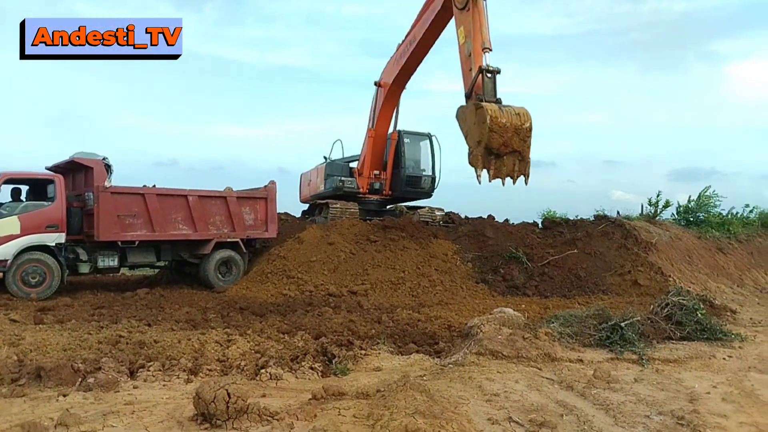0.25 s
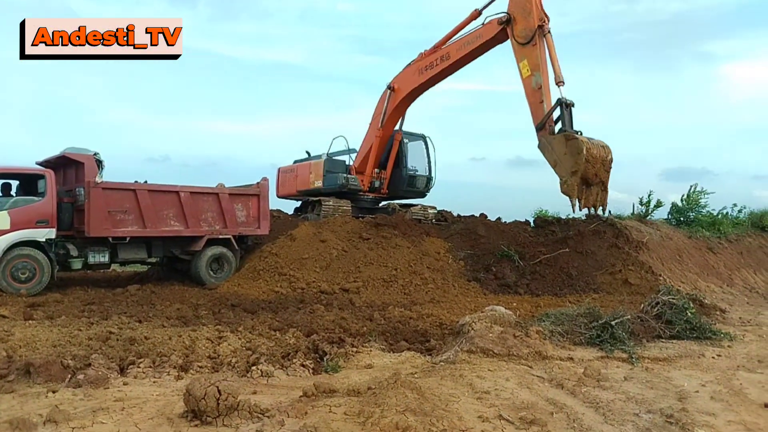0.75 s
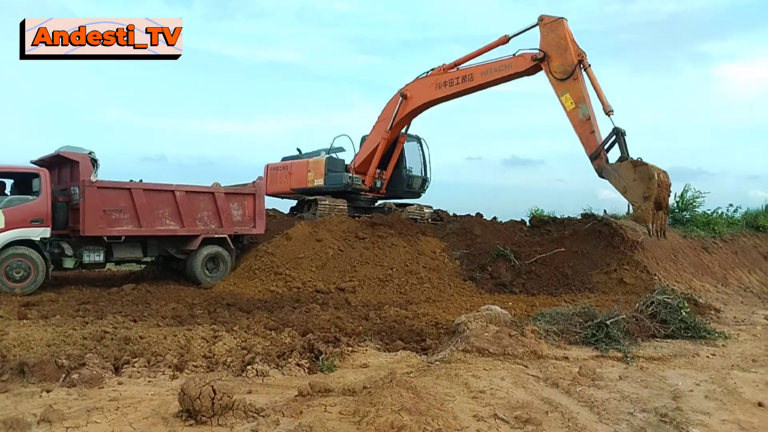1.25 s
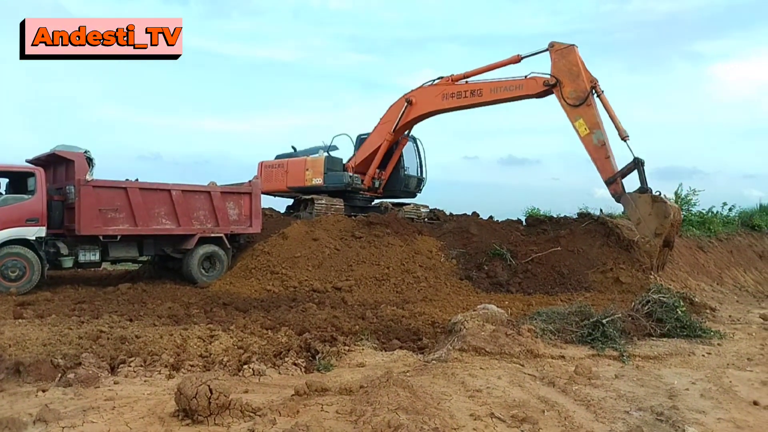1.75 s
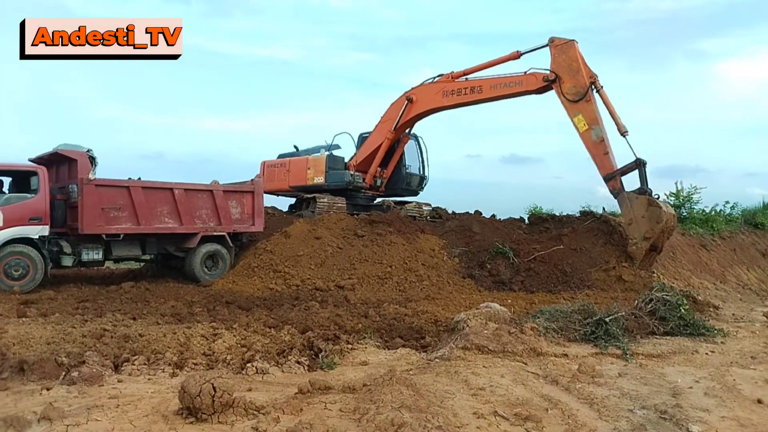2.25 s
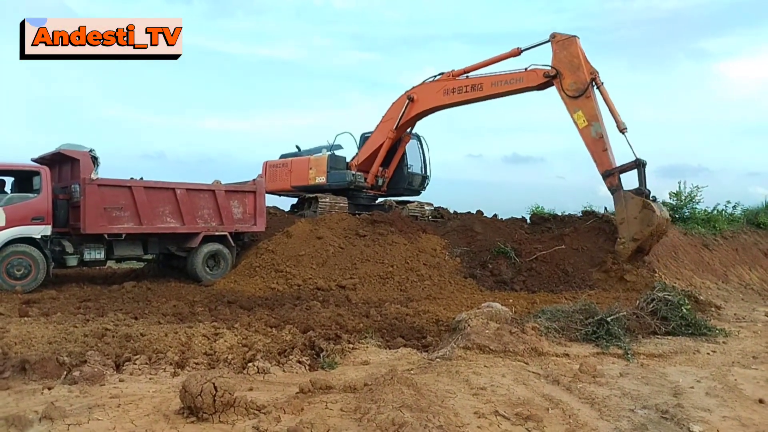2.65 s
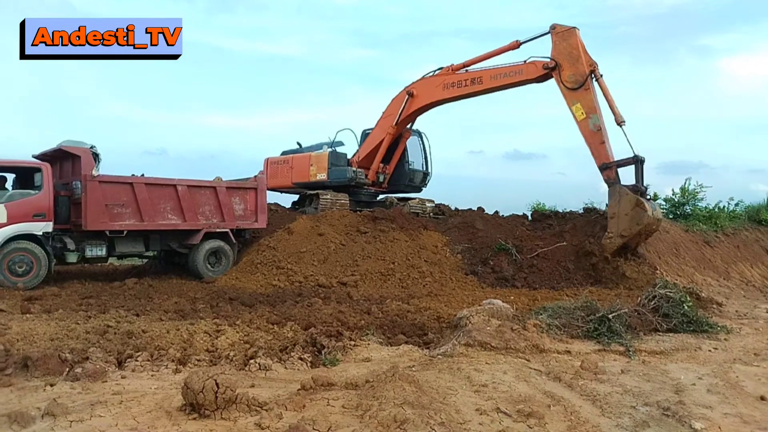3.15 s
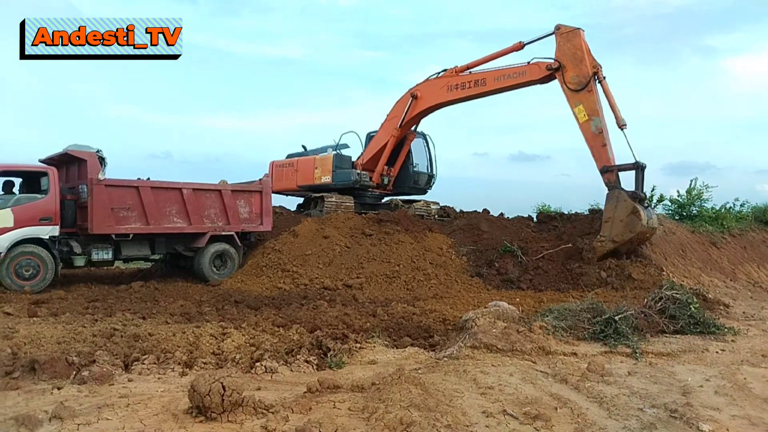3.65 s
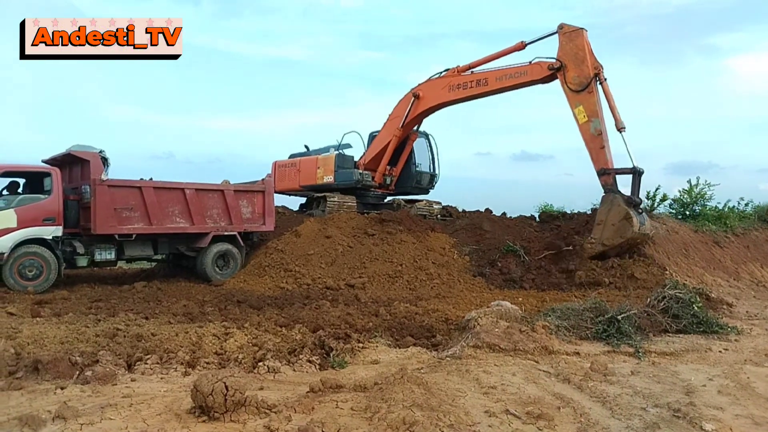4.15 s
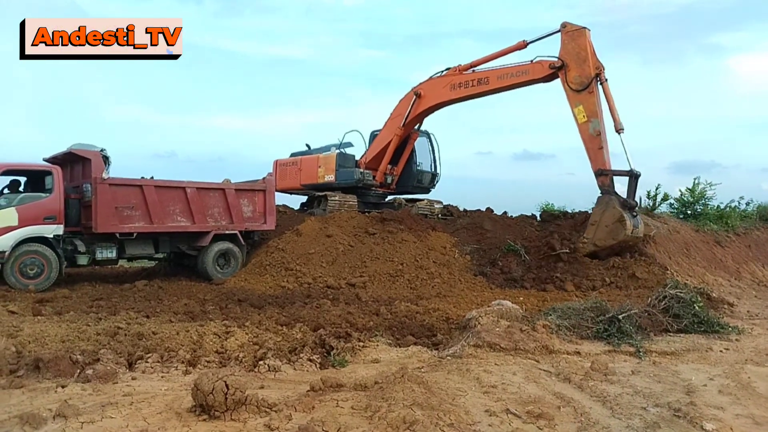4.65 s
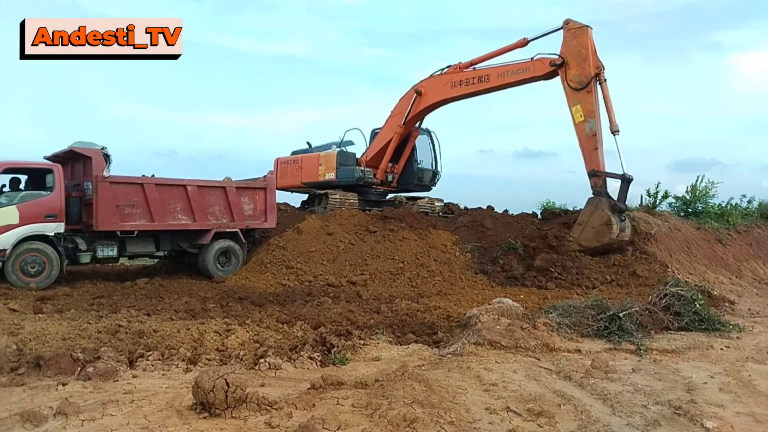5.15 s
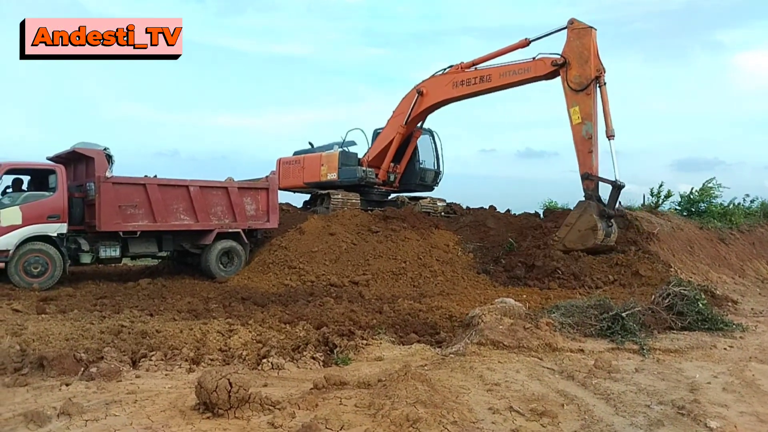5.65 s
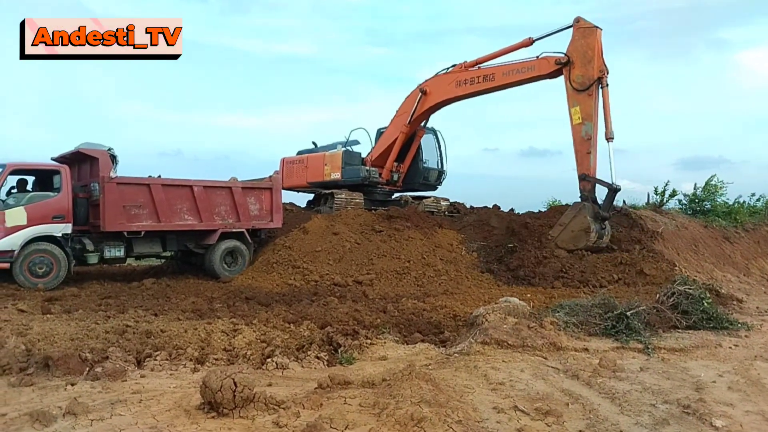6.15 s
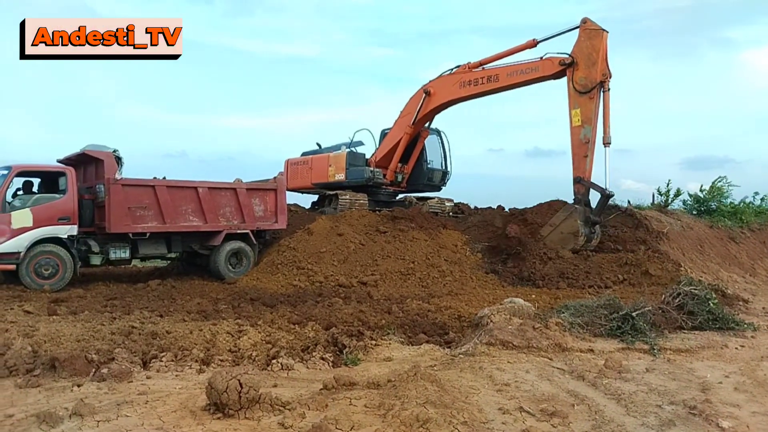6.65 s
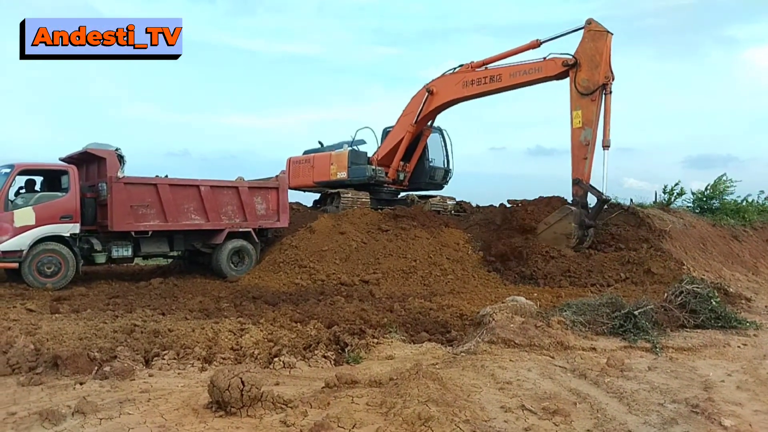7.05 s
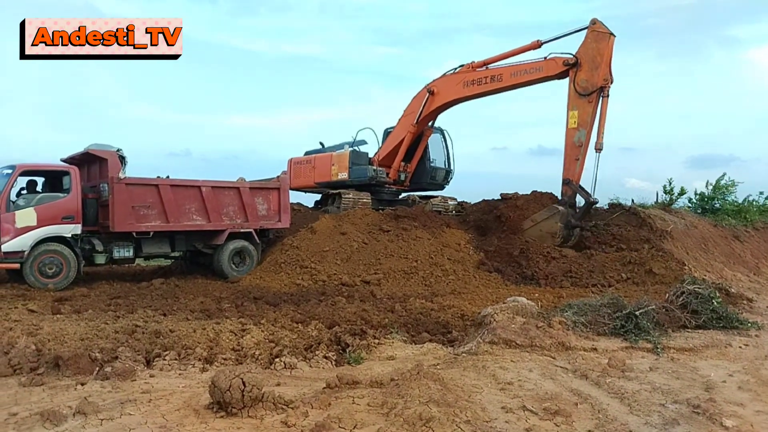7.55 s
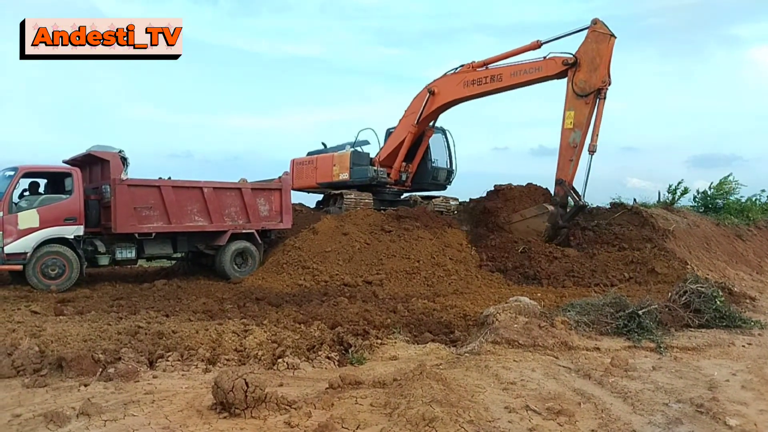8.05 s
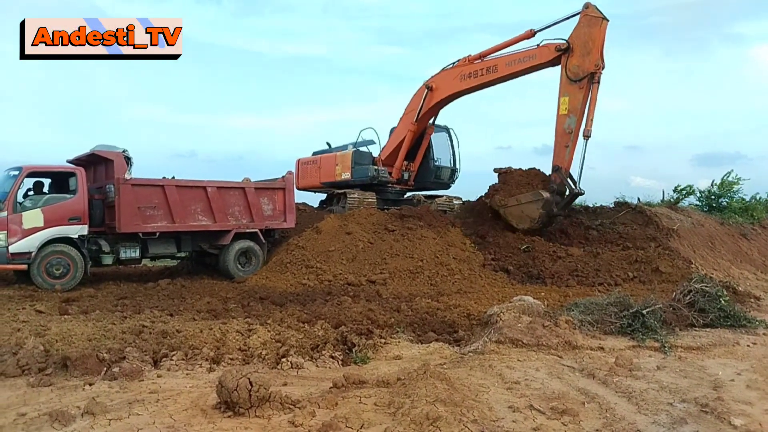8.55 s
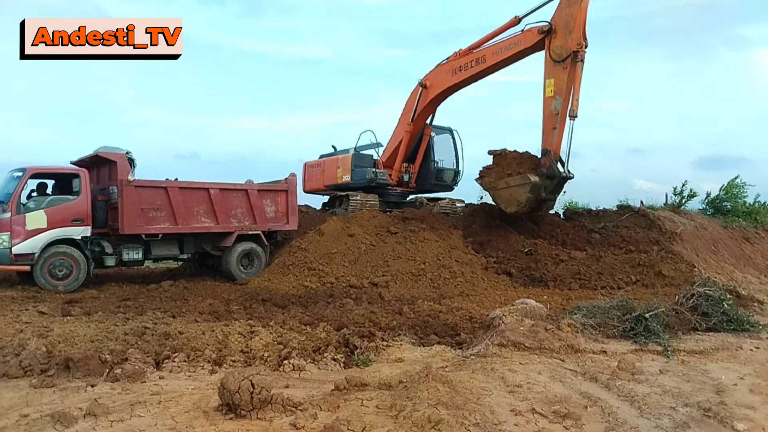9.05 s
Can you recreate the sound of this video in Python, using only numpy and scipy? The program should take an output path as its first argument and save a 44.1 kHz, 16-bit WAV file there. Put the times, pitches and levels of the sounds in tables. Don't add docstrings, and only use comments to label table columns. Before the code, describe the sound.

On an open, windy dirt mound, a close phone microphone is battered by gusts: deep fluttering booms and abrupt thumps almost continuous from 0 to 3 seconds, the worst near 0.7, 1.6 and 4.6, briefly ducking the sound. Under them a diesel excavator roars steadily, with fan and pump hum near 170 Hz and a thin wavering turbo whistle around 8 kHz. Until 2 seconds the swing adds airy hiss; rough joint groans, rubs and short squeals come at 0.2 to 1. At 2.33 the bucket lands with a quick double clank, bright scraping and a short ring. The hum rises near 3; hard pebble pings hit at 3.23 and 3.45. Digging follows, the whistle swelling at 4.1, 5, 6.2, 6.8, 7.2 and 8, with tiny grit snaps at 5.2 and 7.1. A truck idles, ticking about 23 times a second. Wind thuds continue more sparsely until 9.3.

```python
import sys
import numpy as np
from scipy import signal
from scipy.fft import rfft, irfft
from scipy.io import wavfile
from scipy.ndimage import uniform_filter1d, minimum_filter1d

SR = 44100
rng = np.random.default_rng(int(sys.argv[2]) if len(sys.argv) > 2 else 0)


def level_to_linear(level):
    exponent = np.asarray(level, float) / 20
    return 10 ** exponent


def dump(signal):
    limited = np.clip(np.atleast_2d(signal).T, -1, 1)
    pcm = np.round(limited * 32767).astype(np.int16)
    wavfile.write(sys.argv[1], SR, pcm)


N = 410571
TIME = np.arange(N) / SR


def unit(x):
    return x / np.sqrt(np.mean(x ** 2))


def read(table):
    s, *columns = np.transpose(table)
    return [np.interp(TIME, s, c) for c in columns]


def colour(x, points):
    hz, db = np.transpose(points)
    f = np.arange(N // 2 + 1) * SR / N + 1
    return irfft(rfft(x) * level_to_linear(np.interp(np.log(f), np.log(hz), db, left=-80, right=-80)), N)


def band(x, hz, width):
    return signal.lfilter(*signal.iirpeak(min(hz, .45 * SR), hz / width, SR), x)


def noise():
    return rng.standard_normal(N)


def steep(hz, width):
    return unit(band(band(noise(), hz, width), hz, width))


def walk(rate):
    k = int(SR / rate)
    held = np.repeat(rng.standard_normal(N // k + 1), k)
    return unit(uniform_filter1d(uniform_filter1d(held, k), k)[:N])


def burst(s, t60, rise):
    t = np.maximum(TIME - s, 0)
    return (1 - np.exp(-t / rise)) * np.exp(-np.log(1000) * t / t60)


def tone(phase, multiple=1):
    return np.sin(multiple * phase)


def wind():
    # t/s, peak level/dB, sharp edge above peak/dB
    sharp_eddies = [(0.578, 1, -16), (0.659, 10, -14.5), (0.7, 6, -12), (0.78, -11, -5), (0.87, 2.5, -13.5),
                    (1.005, 0, -18), (1.039, -2, -6.5), (1.064, 1, -7), (1.187, 2.5, -13), (1.265, 3, -16),
                    (1.295, -8, -1.5), (1.341, -6.5, -13), (1.443, -4.5, -13), (1.601, 10, -19),
                    (1.72, -1, -12), (1.913, -7, -12), (2.238, -3, -23), (2.308, -2, -19), (2.542, -3, -16),
                    (2.632, 4.5, -25), (2.887, 1.5, -15), (4.511, -3, -8.5), (4.554, 8, -14.5),
                    (4.633, 3.5, -9), (4.669, 2, -14), (4.733, -1.5, -11), (5.12, 4.5, -25),
                    (5.469, -2.5, -25), (5.719, -8, -11.5), (8.367, -2, -21), (1.02, 3, -12),
                    (1.134, -2.5, -14), (1.361, -13, -7), (1.402, -7, -9.5), (1.46, -9, -11),
                    (1.553, -11, -20), (2.098, -21, -20), (2.17, -18, -16), (2.323, -13, -19),
                    (2.383, -13, -6), (2.726, -8, -15), (2.916, -2, -14), (3.49, -16, -15),
                    (4.71, -19, -15), (5.103, -5, -16), (5.232, -10, -25), (5.499, -9, -16),
                    (7.274, -8, -20), (7.845, -13, -16), (8.248, -7, -18), (8.506, -8.5, -25),
                    (8.533, -21, -31), (9.259, -14, -17), (.721, 0.5, -14), (1.284, -7, -8),
                    (1.492, -3.5, -17), (1.52, -8, -17), (1.734, -2, -11), (1.815, -6, -16),
                    (2.344, -11, -10)]
    # t/s, peak level/dB
    puffs = [(.035, -2.5), (.814, -5), (1.65, 9), (1.766, 5.5), (1.95, -6.5), (2.018, -5), (2.41, -15),
             (2.497, -3), (2.688, 2), (2.93, -2), (3.471, -1.5), (3.698, -16), (3.982, -13), (4.984, -4),
             (5.08, -5.5), (5.171, -3), (5.432, -3), (5.554, -2.5), (5.676, -18), (6.915, -22.5),
             (7.261, -26), (7.597, -9.5), (7.826, -4), (7.931, -7.5), (8.06, -16), (8.231, -5.5),
             (8.481, -14), (8.555, -4), (8.981, -8.5), (9.08, -19)]
    # f/Hz, level/dB per Hz
    rumble_colour = [(6, -17), (14, 2), (40, -0.5), (70, 1), (130, -2), (200, -15)]
    # offset/dB, dB per dB of rumble, dB per dB of bite
    deep_law = (-0.55, 0.77, 0.037)
    deep_hz = 76

    flicker = walk(35)
    rumble = unit(colour(noise(), rumble_colour) * level_to_linear(0.69 * flicker + 1.82 * walk(12)))
    deep = colour(rumble, [(1, 0), (deep_hz, 0), (2 * deep_hz, -20)])
    buffet = colour(noise(), [(100, -2.5), (140, 3), (220, 1.0), (330, -13.5), (420, -23.0)])
    buffet = unit(buffet * level_to_linear(3.57 * flicker))
    pop_db = np.minimum(2.8 * rng.exponential(size=N), 7) + 3.2 * flicker
    pops = (rng.random(N) < 600 / SR) * noise() * level_to_linear(pop_db)
    flutter = unit(colour(pops, [(280, -18), (350, 2.5), (550, -4.5), (800, -15.5), (1300, -28.5), (2000, -74)]))
    steady = gusts(*deep_law) * deep + gusts(0, 1.23, 0.13) * (rumble - deep)
    steady += level_to_linear(-2.5) * gusts(-1.54, 1.18, 0.87) * buffet
    steady += level_to_linear(-4) * gusts(-10, 1.6, 2.86) * flutter

    eddies = sharp_eddies + [(s, db, -27.5) for s, db in puffs]
    body = sum(level_to_linear(db) * burst(s - .006, 0.13, 0.0056) for s, db, _ in eddies)
    thud = unit(colour(noise(), [(60, -1.5), (180, 0.5), (300, -7.5), (500, -17.5), (800, -28.5)]))
    chance = rng.standard_normal((len(eddies), 8))
    jumps = np.zeros(N)
    for (s, db, edge_db), row in zip(eddies, chance):
        delay = np.array([0, .002, .004, .007]) * (1 + 0.33 * row[:4])
        at = ((s + 0.001505 + delay) * SR).astype(int)
        jumps[at] += level_to_linear(db + edge_db + np.array([3.0, -4.5, -3.0, -3])) * np.sign(row[4:])
    snap = signal.sosfilt(signal.butter(2, [330, 780], "bandpass", fs=SR, output="sos"), jumps)
    return steady + level_to_linear(-0.5) * body * thud + level_to_linear(35) * snap


def gusts(offset_db, per_db, per_bite):
    # t/s, length/s, rumble level/dB, bite/dB (reach into the small eddies)
    gust_times = [(0, 0.1, -8.5, -2.5), (0.225, 0.16, -23, 4), (0.388, 0.16, -12.5, -2),
                  (0.545, .2, -10, 0.5), (0.764, 0.16, -9, 1), (0.993, 0.095, -8, 1.5),
                  (1.12, 0.036, -13, 3), (1.18, 0.15, -8.5, 0.5), (1.33, .14, -8.5, -0.5),
                  (1.498, 0.18, -10.5, 2), (1.702, 0.18, -10.5, 0), (1.891, 0.17, -8, -1),
                  (2.082, 0.16, -10.5, 0), (2.262, 0.064, -14.5, 1), (2.376, 0.15, -21.5, 4),
                  (2.477, 0.28, -11.5, 1), (2.78, 0.14, -8, 0), (3.005, 0.24, -21, -2),
                  (3.552, 0.051, -18, -17), (3.441, 0.041, -9, -15), (3.68, 0.024, -10.5, -5),
                  (3.965, 0.051, -11, -7), (4.489, 0.078, -10, 0.5), (4.612, 0.15, -7.5, -1.5),
                  (4.905, 0.34, -9, -6), (5.091, 0.2, -10.5, -4.5), (5.387, 0.13, -11, -1.5),
                  (5.656, 0.08, -9.5, -1), (5.787, 0.12, -23, 2), (6.468, 0.22, -20.5, -6),
                  (6.908, 0.013, -19, -2.5), (7.242, 0.022, -8.5, -4.5), (7.58, 0.015, -18.5, -8),
                  (7.793, 0.34, -13.5, -6.5), (8.19, .24, -13.5, -3), (8.47, 0.079, -7.5, -6.5),
                  (8.612, 0.11, -13, -5.5), (8.921, 0.11, -14, -4.5), (7.336, 0.26, -20, -12),
                  (9.242, 0.085, -16, -1.5)]
    lull_db, lull_bite_db, lull_sway_db = -25.5, -2.5, 0.5
    fall_t60_s = 0.28

    def gain(db, bite_db):
        return level_to_linear(-10 + offset_db + per_db * (db + 10.5) + per_bite * bite_db)

    power = gain(lull_db + lull_sway_db * walk(8.1), lull_bite_db) ** 2
    for s, length, db, bite_db in gust_times:
        rise_s = 0.022 + 0.082 * min(length, .25)
        rise = np.clip((TIME - s) / rise_s + .5, 0, 1) ** 2
        fall = level_to_linear(-60 * np.maximum(TIME - s - length, 0) / fall_t60_s)
        power = power + (gain(db, bite_db) * rise * fall) ** 2
    return np.sqrt(power)


def shoves():
    # t/s, peak level/dB, f/Hz
    slugs = [(.875, -2, 90), (2.79, -9, 60), (3.697, -15, 130), (4.508, -1.5, 90), (4.63, 0, 70),
             (5.7, -4, 69), (5.731, -1, 70), (6.916, -8.5, 65), (7.591, -7, 121), (8.256, -5, 110),
             (8.29, -3, 140), (8.504, -1.5, 90), (8.691, -1.5, 110)]
    cycles = 2.9
    out = 0
    for s, db, hz in slugs:
        out = out + level_to_linear(db + 3) * burst(s, cycles * 1.9 / hz, 0.0019) * np.sin(2 * np.pi * hz * (TIME - s))
    return out


def limit_swings(x):
    top, hold_s = 1.104, 0.0056
    k = int(hold_s * SR)
    return x * uniform_filter1d(minimum_filter1d(top / np.maximum(np.abs(x), top), k), k)


def turning():
    return np.clip((2 - TIME) / 0.5, 0, 1)


def excavator():
    # t/s, level/dB
    roar_level = [(0, -42), (.4, -37.5), (1.2, -43), (2.3, -39.5), (3.3, -42), (4.4, -41.5), (7.7, -42),
                  (8.07, -41), (8.4, -43), (9.31, -42.5)]
    # f/Hz, level/dB per Hz
    roar_colour = [(180, -13), (300, -9.5), (385, -4.5), (508, -2), (644, -5.5), (817, -0.5), (1090, -15.5),
                   (1380, -2), (1660, -6.5), (1870, -11), (2140, -11), (2670, -7.5), (4190, -21.5),
                   (5820, -17), (7000, -19.5), (9100, -50), (15400, -120)]
    # f/Hz, level/dB per Hz
    hiss_colour = [(5000, -18), (8500, -2.5), (9420, -3), (10200, -11.5), (12300, -12.5), (14500, -26),
                   (15600, -20)]
    # f/Hz, width/Hz, level/dB
    casing = [(938, 92, -0.5), (1330, 910, -6.5), (1854, 50, 8), (2520, 430, -3.5), (2850, 150, -31)]
    # t/s, rate/Hz
    firing_rate = [(0, 79.8), (3.4, 79.05), (4, 74.6), (6, 73.4), (7.5, 74.8), (8.6, 75.3), (9.31, 75.5)]
    # t/s, f/Hz
    spool = [(0, 8170), (.55, 8210), (.9, 8320), (1.2, 8340), (1.6, 8290), (2.3, 7880), (2.65, 7730),
             (3, 7940), (3.7, 8030), (5, 7900), (6, 7865), (6.8, 7875), (7.2, 7945), (7.8, 7920),
             (8.5, 8010), (9.31, 8030)]
    # t/s, level/dB, length/s
    surges = [
        (4.104, 2, 0.21),
        (4.526, 1, 0.18),
        (4.98, 5, 0.18),
        (6.202, 4, 0.074),
        (6.75, 7, 0.25),
        (7.21, 6.5, 0.4),
        (8.052, 4.5, 0.3),
    ]

    roar_db = read(roar_level)[0]
    hiss_db = roar_db - 5.5 + 2.5 * turning()
    turbo_db = np.where(TIME < 2.5, -42.5, -40.5) - 1.27 * walk(5.77)
    turbo_db += sum(db * np.exp(-((TIME - s) / length * 2) ** 2) for s, db, length in surges)

    firing = 2 * np.pi * np.cumsum(read(firing_rate)[0] * (1 + 0.00568 * walk(6.5))) / SR
    air = noise() * level_to_linear(0.56 * tone(firing) + 0.67 * walk(14))
    echoes = sum(level_to_linear(db) * band(air, hz, width) for hz, width, db in casing)
    roar = unit(colour(air + echoes, roar_colour))
    hiss = unit(colour(noise() * level_to_linear(0.28 * tone(firing) + 0.65 * walk(14)), hiss_colour))

    spin = 2 * np.pi * np.cumsum(read(spool)[0] + 7 * walk(25)) / SR
    ripple = 1.3 * (1 + .3 * walk(3)) * tone(firing) + .6 * np.sin(2 * firing + 1.3)
    pulse = 1 + 0.42 * np.sin(firing + 0.26) + 0.061 * tone(firing, 2)
    clean = np.sin(spin + ripple) * pulse * level_to_linear(2.4 * walk(30))
    breathy = steep(50, 140) * np.sin(spin) + steep(50, 140) * np.cos(spin)
    whistle = level_to_linear(0.5) * unit(clean) + level_to_linear(-1.5) * unit(breathy)
    return level_to_linear(roar_db + 6.0) * roar + level_to_linear(hiss_db + 3.5) * hiss + level_to_linear(turbo_db) * whistle


def pump():
    # t/s, piston rate/Hz, fifth multiple level/dB, fan hum f/Hz, hum level/dB
    speeds = [(0, 168, -47, 168, -40), (.25, 168, -45, 168, -31), (.5, 166, -48, 167, -32),
              (2.8, 178.6, -48, 180, -34), (3.1, 178.1, -43, 180, -22.5), (3.8, 176, -41.5, 176.5, -24),
              (4.1, 174.8, -43.5, 177, -25), (4.4, 168, -47, 172, -30), (5, 166.4, -48, 171.5, -36),
              (5.85, 164.8, -47, 170, -33), (6.2, 163.3, -46, 169, -32), (6.5, 165.7, -47, 169.5, -33),
              (7.05, 166.2, -45, 172, -30), (7.7, 167, -45, 172.5, -28), (8, 170.5, -50, 174, -31),
              (8.55, 173.5, -51, 177, -37), (8.9, 177, -47, 180, -36), (9.31, 177.8, -52, 180, -37)]
    hz, fifth_db, fan_hz, hum_db = read(speeds)
    turn, fan = (2 * np.pi * np.cumsum(f * (1 + .001 * walk(8))) / SR for f in (hz, fan_hz))
    blades = tone(fan) + level_to_linear(-27) * tone(fan, 2) + level_to_linear(-24) * tone(fan, 3) + level_to_linear(-37) * tone(fan, 4)
    hum = level_to_linear(hum_db + .5 * walk(5.4)) * blades
    whine = level_to_linear(fifth_db + 1 + .6 * walk(5)) * tone(turn, 5)
    return np.sqrt(2) * (hum + whine)


def swing():
    # f/Hz, width/Hz, level/dB
    jets = [(11600, 450, -60), (14200, 450, -69), (15350, 500, -63), (10700, 300, -62)]
    return turning() * sum(level_to_linear(db + 2.0 * walk(8)) * steep(hz, width) for hz, width, db in jets)


def bucket():
    # f/Hz, level/dB, t60/s
    pin = [(1610, -9, .06), (2900, -2, .06), (3300, -8, .05), (4745, -10, .075), (5900, -14, .06),
           (6250, -7, .07), (6560, -10, .07), (6920, -12, .07), (7770, -5, .07), (8265, -5, .08),
           (8780, -14, .06), (9405, -7, .08), (10300, -16, .06), (11400, -15, .07)]
    # f/Hz, level/dB, t60/s
    shell = [(2832, -11, .25), (3628, -17, .25), (4100, -17, .15), (5749, 0, .12), (6202, -5, .2),
             (6330, -6, .15), (6460, -6, .15), (6600, -6, .18), (6835, -3, .13), (7031, -11, .15),
             (7192, 0, .13), (8409, -13, .2), (10400, -13, .2), (11370, -17, .1)]
    # t/s, pin level/dB, shell level/dB
    strikes = [
        (2.326, -19, -45),
        (2.333, -13, -42),
        (2.343, -19, -42),
        (2.361, -30, -16),
        (2.375, -45, -33),
        (2.386, -45, -28),
    ]
    # t/s, level/dB, f/Hz, t60/s
    crashes = [(2.288, -26, 2600, 0.071), (2.29, -27, 1900, .06), (2.327, -19, 6400, .2),
               (2.328, -26.5, 2110, 0.69), (2.33, -27.5, 1260, 0.55), (2.333, -18.5, 2850, 0.11),
               (2.33, -35, 3900, 0.33), (2.344, -12.5, 7750, 0.1), (2.348, -34, 13000, .045),
               (2.361, -2, 6830, 0.072), (2.363, -22, 2700, 0.18), (2.363, -32, 11500, .13),
               (2.35, -26, 754, 0.55), (2.3755, -9, 6900, 0.059), (2.386, -18, 6300, 0.091),
               (2.391, -36, 10500, 0.16), (2.398, -22, 6600, 0.081), (2.412, -35, 5600, .2)]

    modes = [(0, m) for m in pin] + [(1, m) for m in shell]
    mix = rng.standard_normal((len(strikes), len(modes)))
    waver = [1 + 0.44 * walk(150) for _ in modes]
    scrape = sum(level_to_linear(db) * burst(s, t60, 0.0012) * steep(hz, 0.42 * hz) for s, db, hz, t60 in crashes)
    out = scrape * level_to_linear(0.81 * walk(300))
    for (s, *ring_db), row in zip(strikes, mix):
        for (part, (f, db, t60)), share, rough in zip(modes, row, waver):
            level = level_to_linear(ring_db[part] + db + 0.93 * share)
            out += level * burst(s, t60, 0.002) * np.sin(2 * np.pi * f * TIME + 3 * share) * rough
    return out


def groans():
    # t/s, peak level/dB, f/Hz, width/Hz, t60/s
    slips = [(.226, -29, 774, 200, 0.47), (.225, -29, 1700, 1300, .15), (.404, -28, 2260, 250, 0.076),
             (0.422, -24, 1850, 204, 0.098), (0.21, -37, 1800, 1600, 0.36), (.515, -52, 3000, 700, 0.44),
             (.728, -35, 2200, 250, .12), (.806, -43, 2600, 800, 0.47), (.83, -35, 2600, 1400, .3),
             (0.26, -40, 2500, 900, .25), (0.79, -29, 2900, 300, .08), (.985, -41, 2900, 1600, 0.41),
             (6.44, -40, 6800, 6400, 0.21), (8.0, -45, 5000, 4000, .6)]
    out = sum(level_to_linear(db) * burst(s, t60, 0.0013) * steep(hz, width) for s, db, hz, width, t60 in slips)
    return out * level_to_linear(3.1 * np.clip(walk(90.1), -2, 1))


def rubs():
    # t/s, length/s, level/dB, f/Hz, width/Hz
    contacts = [(.405, 0.083, -37, 2200, 1800), (.515, .11, -45, 2750, 800),
                (.805, 0.084, -34.5, 2720, 900), (.805, 0.089, -38, 1490, 900), (.985, .08, -42, 2750, 900),
                (2.33, 0.088, -29, 1900, 2200), (2.35, .09, -32.5, 696, 600)]
    edge_s = .008
    out = 0
    for s, length, db, hz, width in contacts:
        hold = np.clip(np.minimum(TIME - s, s + length - TIME) / edge_s + .5, 0, 1)
        out = out + level_to_linear(db + 2.0 * walk(150)) * hold * steep(hz, width)
    return out


def squeals():
    # t/s, length/s, from f/Hz, to f/Hz, level/dB
    slides = [
        (.815, .05, 1680, 1900, -33),
        (.515, .07, 3100, 3120, -40),
        (.15, .07, 2700, 2680, -40),
    ]
    out = 0
    for s, length, from_hz, to_hz, db in slides:
        along = np.clip((TIME - s) / length, 0, 1)
        turn = 2 * np.pi * np.cumsum(from_hz + (to_hz - from_hz) * along + 25 * walk(79)) / SR
        out = out + level_to_linear(db + 2.5 * walk(59)) * np.sqrt(np.sin(np.pi * along).clip(0)) * np.sin(turn)
    return out


def grit():
    # t/s, peak level/dB, f/Hz, width/Hz, t60/s
    clicks = [(.66, -28, 4500, 4000, .02), (1.19, -38, 3000, 1500, .03), (.85, -29, 7900, 6000, 0.2),
              (1.713, -34, 6050, 3000, .08), (1.757, -35, 5430, 900, 0.098), (2.017, -37, 6000, 1500, .06),
              (.866, -33, 10000, 1200, .05), (.866, -23, 7700, 1200, .03), (3.411, -28, 2700, 700, .03),
              (3.487, -40, 11500, 3000, .05), (4.423, -35, 11060, 4000, .015),
              (4.98, -34, 10000, 4000, .015), (5.128, -33, 11000, 2000, .016),
              (5.193, -36, 12000, 3000, .012), (5.212, -32, 11000, 5000, .012),
              (5.216, -29, 12500, 4000, .03), (5.217, -31, 6000, 3000, .03), (5.226, -32, 11000, 3000, .04),
              (5.252, -36, 13000, 4000, .008), (5.344, -32, 10000, 3000, .015),
              (5.579, -29, 12000, 3000, .012), (6.864, -34, 11200, 3000, .015),
              (6.947, -37, 11000, 3000, .02), (7.13, -31, 9500, 3480, .015), (7.135, -25, 9350, 3500, .02),
              (7.148, -32, 11000, 2000, .03), (9.071, -32, 11000, 4000, .015),
              (9.235, -38, 11400, 3000, .1), (.4, -33, 8500, 4250, .9), (1.0, -31, 8100, 4050, .38)]
    return sum(level_to_linear(db) * burst(s, t60, t60 / 40) * steep(hz, width) for s, db, hz, width, t60 in clicks)


def pings():
    # t/s, peak level/dB, f/Hz
    pebbles = [
        (3.2287, -19, 8300),
        (3.2311, -4.5, 8560),
        (3.4458, -8.5, 8500),
        (3.4478, -21, 8000),
    ]
    t60_s = 0.0022
    out = 0
    for s, db, hz in pebbles:
        turn = 2 * np.pi * hz * (TIME - s)
        ring = burst(s, t60_s, .0001) * tone(turn)
        edge = burst(s, t60_s / 3, .00005) * tone(turn, 1.2)
        out = out + level_to_linear(db + 3.5) * (ring + level_to_linear(-8) * edge)
    return out


def truck():
    ticks_hz, lag_cycles, knock_late_cycles = 23.092, .58, .17
    cycle = TIME * ticks_hz + lag_cycles
    chance = rng.standard_normal(int(cycle[-1]) + 2)
    size = level_to_linear(1.6 * chance + 4 * uniform_filter1d(chance, 9))

    def gate(c):
        return size[c.astype(int)] * np.sin(np.pi * np.minimum(c % 1 / .5, 1)) ** 2

    block = unit(colour(noise(), [(900, -50), (1500, 12), (2700, 25), (4500, -0.5), (9000, -6), (13000, -17)]))
    jet = unit(colour(noise(), [(4500, -37), (6500, -4), (9300, 9), (12000, -5), (15400, -14)]))
    cover = level_to_linear(-45.2) * steep(5850, 900) + level_to_linear(-47) * jet
    screen = level_to_linear(-4 * np.clip(1.75 - TIME, 0, 1))
    return screen * gate(cycle) * cover + level_to_linear(-42) * gate(cycle - knock_late_cycles) * block


def scene():
    port = limit_swings(wind() + shoves())
    machines = excavator() + pump() + swing() + truck()
    steel = bucket() + groans() + rubs() + squeals()
    return (port + machines + steel + grit() + pings())[None]


def flatten(x, top):
    return x / (1 + np.abs(x / top) ** 12) ** (1 / 12)


def low_pass(x):
    return signal.sosfilt(signal.butter(12, 15550, fs=SR, output="sos"), x)


def record(dry):
    # t/s, level/dB
    ducks = [(0.661, -4.5), (.89, -1), (1.069, -4.5), (1.26, -0.5), (1.612, -7), (2.358, -5), (4.557, -3),
             (4.64, -3), (4.74, -1.5)]
    ducked = dry * level_to_linear(sum(db * burst(s, 0.78, 0.014) for s, db in ducks))
    return low_pass(flatten(ducked, 0.85))


dry = scene()
out = record(dry)
dump(out)
```